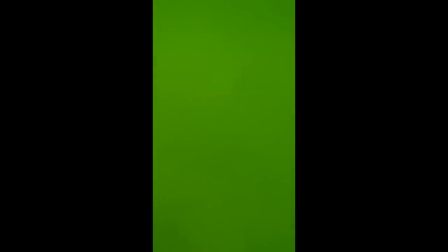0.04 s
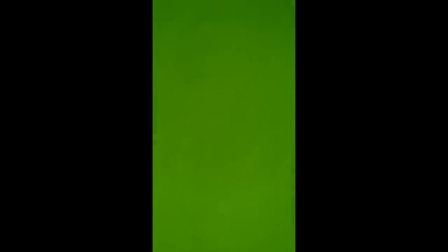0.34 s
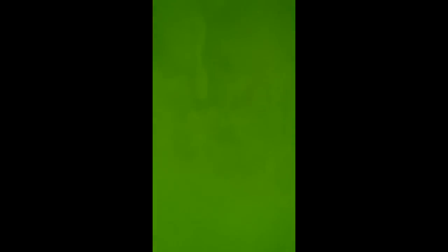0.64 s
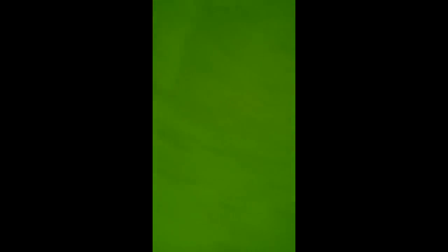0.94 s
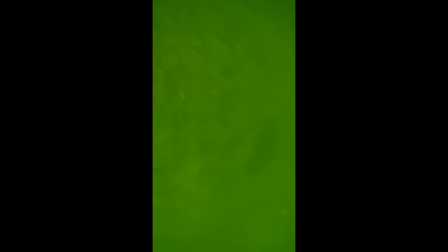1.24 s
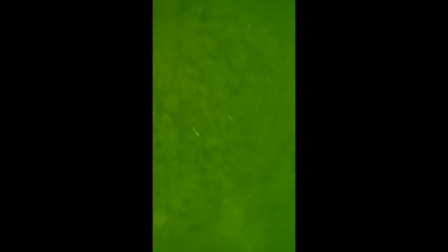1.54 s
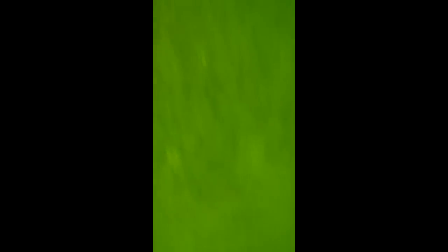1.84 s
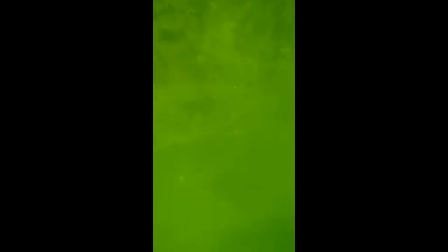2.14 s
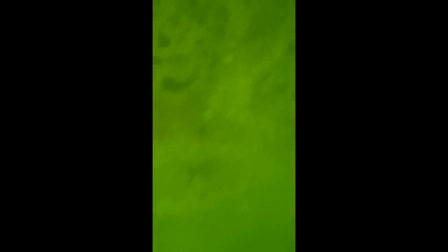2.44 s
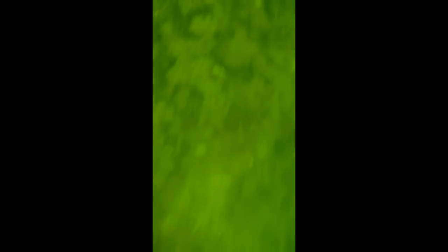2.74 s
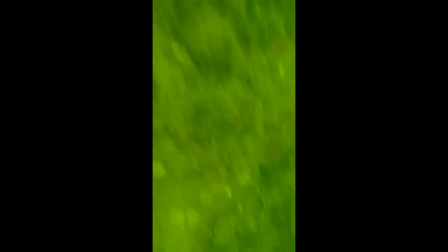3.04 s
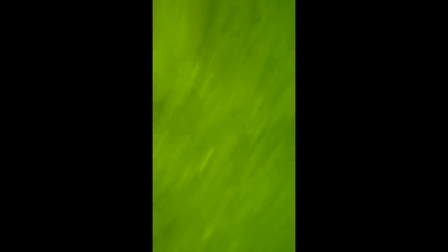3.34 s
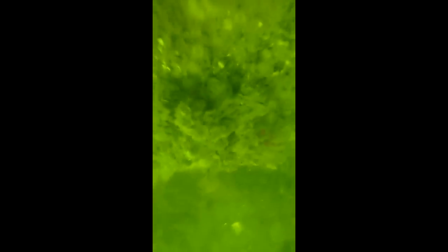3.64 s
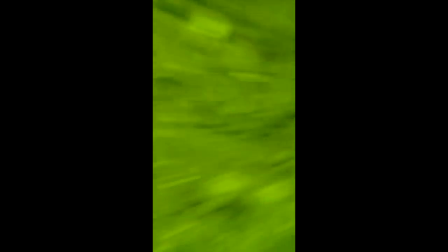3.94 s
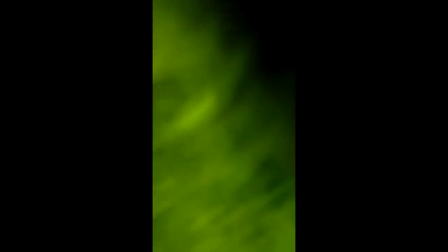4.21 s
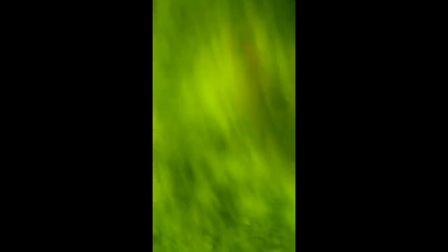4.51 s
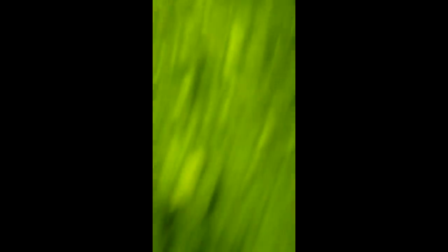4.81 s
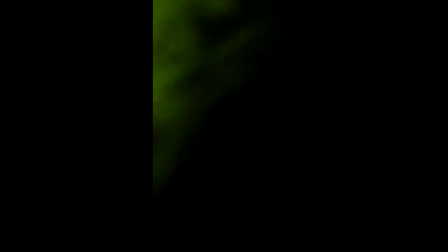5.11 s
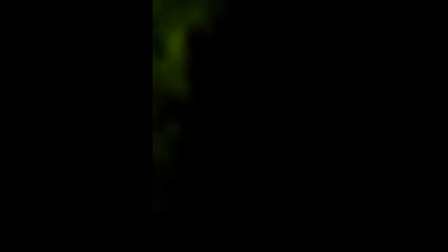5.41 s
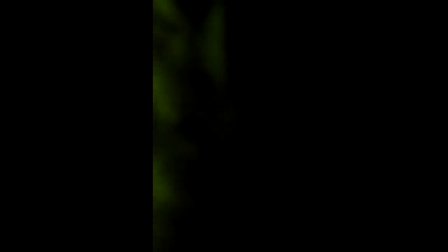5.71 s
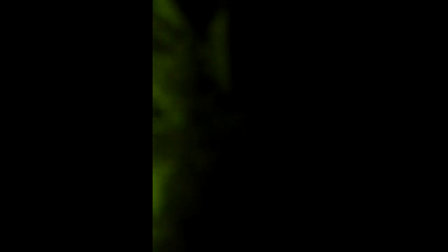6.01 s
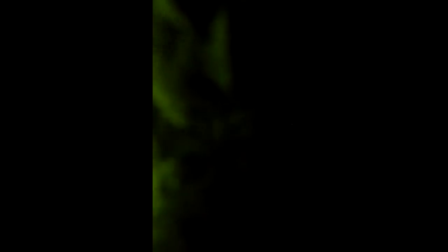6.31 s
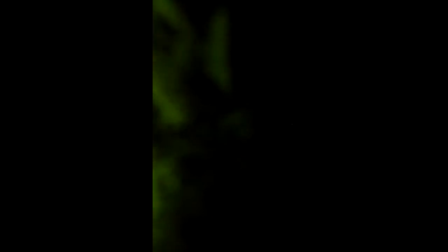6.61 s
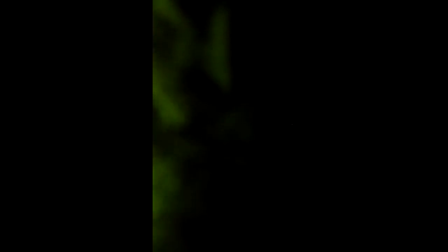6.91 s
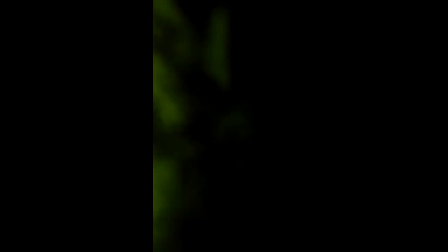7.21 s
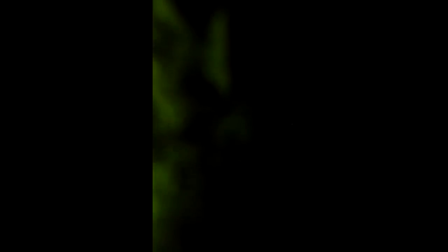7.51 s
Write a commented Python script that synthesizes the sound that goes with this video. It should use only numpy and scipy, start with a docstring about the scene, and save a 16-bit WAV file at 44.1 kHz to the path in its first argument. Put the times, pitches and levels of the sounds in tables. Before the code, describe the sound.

Heard from inside a waterproof camera housing, muffled water rumbles and swells over a low steady hum, with faint ticks of grit and occasional glugs. Then close, heavy knocks and gritty finger scrapes hit the housing, briefly overloading the microphone. Water gurgles, and more bumps and rubbing follow. Things settle back to the quiet underwater wash and hum, with a couple of light bumps.

```python
"""A waterproof camera drifts through murky water: a dull wash, the hum of a small motor, faint crackle.
Grains tick against its housing, surges make it ring, bubbles blip and glug, and light knocks come and go.
From about 4 s fingers bump, snap, scrape and slide over it, in harsh bursts that overload the microphone.
By 6 s it comes to rest, and the muffled wash goes on with a few soft knocks."""
import sys
import numpy as np
from scipy import signal
from scipy.fft import rfft, irfft
from scipy.io import wavfile

SR = 44100
rng = np.random.default_rng(int(sys.argv[2]) if len(sys.argv) > 2 else 0)


def pcm_store(signal):
    """Save signal as 16-bit PCM."""
    levels = np.round(np.clip(np.atleast_2d(signal), -1, 1) * 32767)
    wavfile.write(sys.argv[1], SR, levels.astype(np.int16).T)


N = 332955
TIME = np.arange(N) / SR


def from_db(db):
    """Turn decibels into a factor to multiply by."""
    return 10 ** (np.asarray(db) / 20)


def rms_one(x):
    """Scale a signal so that its average strength (rms) is 1."""
    return x / np.sqrt(np.mean(x ** 2) + 1e-20)


def at_level(sound, level_db, length):
    """Give a short sound the energy of that level held for length seconds."""
    return from_db(level_db) * sound * np.sqrt(length * SR / (np.sum(sound ** 2) + 1e-20))


def add(out, s, sound):
    """Mix a sound in, starting at s seconds."""
    start = round(s * SR)
    out[start:start + len(sound)] += sound[:N - start]


def in_time(rows):
    """Join a table's points with straight lines, giving one curve per column after the time."""
    s, *columns = np.transpose(rows)
    return [np.interp(TIME, s, column) for column in columns]


def swells(rows):
    """A volume curve with one bell-shaped rise and fall per row."""
    return sum(from_db(level_db) * np.exp(-((TIME - s) / width) ** 2) for s, width, level_db in rows)


def drift(rate_hz):
    """A smooth random wander, about 1 in size; a higher rate wanders faster."""
    step = 40   # samples between points
    pole = np.exp(-2 * np.pi * step * rate_hz / SR)
    noise = rng.standard_normal(N // step + 2002)
    slow = signal.lfilter([1], [1, -2 * pole, pole * pole], noise)[2000:]
    return np.interp(np.arange(N) / step, np.arange(len(slow)), rms_one(slow))


def response(colour, size=8192):
    """What one click becomes in a tone colour (a table of how strong each frequency is); energy 1."""
    hz, level_db = np.transpose(colour)
    grid = np.maximum(np.arange(size // 2 + 1) * SR / size, 1)
    gains = from_db(np.interp(np.log(grid), np.log(hz), level_db))
    # minimum phase: the energy comes as early as it can
    cepstrum = irfft(np.log(gains))
    cepstrum[1:size // 2] *= 2
    cepstrum[size // 2 + 1:] = 0
    pulse = irfft(np.exp(rfft(cepstrum)))
    return pulse / np.linalg.norm(pulse)


def coloured(x, colour):
    """Filter a signal to give it a tone colour."""
    return signal.fftconvolve(x, response(colour))[:N]


def flow(colour, level_db, churn_db, churn_hz):
    """Coloured noise whose level wanders by about churn_db."""
    churning = rng.standard_normal(N) * from_db(churn_db * drift(churn_hz))
    return from_db(level_db) * rms_one(coloured(churning, colour))


def ring(clicks, hz, t60):
    """Clicks strike one ringing tone, which fades by 60 dB in t60 seconds."""
    decay, angle = from_db(-60 / (t60 * SR)), 2 * np.pi * hz / SR
    feedback = [1, -2 * decay * np.cos(angle), decay * decay]
    return rms_one(signal.lfilter([0, np.sin(angle)], feedback, clicks + 1e-18))


def resonant(x, hz, sharpness, boost_db):
    """Strengthen one narrow band of a sound."""
    return x + from_db(boost_db) * signal.lfilter(*signal.iirpeak(hz, sharpness, fs=SR), x)


def slips(count, per_s, spread_db):
    """Sticking and slipping makes random clicks of uneven size."""
    sizes = from_db(spread_db * np.minimum(rng.exponential(1, count), 4)) * rng.choice([-1, 1], count)
    return rms_one(sizes * (rng.random(count) < per_s / SR))


def squeak(count, hz, jitter=0.091):
    """Catching and letting go almost regularly makes clicks with a pitch."""
    periods = SR / hz * np.exp(jitter * rng.standard_normal(count))
    at = np.cumsum(periods).astype(int)
    clicks = np.zeros(count)
    clicks[at[at < count]] = 1
    return rms_one(clicks - clicks.mean())


def stroke(length, rise, squeak_hz, per_s=2600, squeak_db=-3, bite=8.2, release_s=0.0022, sag_db=2.5):
    """The clicks of one rub: pressure rises to a sharp bite, sags, then quickly lets go."""
    t = TIME[:round(length * SR) + SR // 20]
    clicks = slips(len(t), per_s, spread_db=2.5) + from_db(squeak_db) * squeak(len(t), squeak_hz)
    clicks[round(rise * SR)] += bite
    pressure = np.minimum(t / rise, 1) * from_db(-sag_db * np.minimum(t / length, 1))
    release = np.exp(-np.maximum(t - length + release_s / 2, 0) / release_s)
    return clicks * pressure * release


def blows(rows, rise_cycles, thud_db, wobble_rad, thud_ratio=0.49):
    """Each blow swells into a wobbling ring that the water damps, with a lower thud under it."""
    out, t, wobble = np.zeros(N), TIME[:SR // 4], wobble_rad * drift(74.5)
    for s, level_db, hz in rows:
        rise = np.clip(rise_cycles / hz, 0.0015, 0.0111)   # seconds: low blows last longer
        swell = (t / rise * np.exp(1 - t / rise)) ** 2
        phase = 2 * np.pi * hz * (t - rise) + np.interp(s + t, TIME, wobble)
        thud = from_db(thud_db) * np.sin(thud_ratio * phase)
        add(out, s - rise, from_db(level_db) * swell * (np.cos(phase) + thud))
    return out


# How strongly the water washes past: t/s, level/dB
WASH_LEVEL = [(0, -33), (.6, -31), (1.3, -33), (1.95, -32.5), (2.28, -32), (2.87, -33), (3.15, -33),
              (3.9, -34), (5.85, -36.5), (6.15, -34), (6.55, -37), (7.3, -38), (7.55, -32.5)]
# Tone colours of the water, low to high: f/Hz, relative level/dB
RUMBLE_COLOUR = [(15, -19), (32, -19.5), (60, -11.5), (90, -5.5), (125, -1.5), (158, 4.5), (180, 0),
                 (215, -3), (310, 1), (410, -4), (560, -18.5), (900, -62.5)]
WASH_COLOUR = [(250, -36.5), (410, -12.5), (490, 0.5), (565, 1), (645, -1), (720, -9), (800, -12.5),
               (940, -21), (1080, -18.5), (1260, -26), (1600, -29.5), (3000, -84)]
HISS_COLOUR = [(600, -8), (1000, 8.5), (1300, 6.5), (1600, -2.5), (2000, 2.5), (2550, -0.5), (2900, -9.5),
               (3500, -14.5), (3900, -11), (4300, -12), (5000, -10), (6300, -25), (10500, -28),
               (15000, -51.5)]

def water():
    """Moving water, heard through a housing that rings near 560 Hz and shuts out most treble."""
    wash_db, = in_time(WASH_LEVEL)
    # rumble and hiss follow the wash only a little
    rumble_db = -34.5 + 0.28 * (wash_db - wash_db.mean())
    hiss_db = -43.5 + 0.25 * wash_db
    dip_db = -18 * np.exp(-((TIME - 4.63) / 0.014) ** 2)   # the level dips briefly
    rumble = flow(RUMBLE_COLOUR, rumble_db + dip_db, churn_db=1.0, churn_hz=6.1)
    wash = flow(WASH_COLOUR, wash_db + dip_db, churn_db=0.88, churn_hz=17.4)
    hiss = from_db(hiss_db) * coloured(rng.standard_normal(N), HISS_COLOUR)
    return rumble + wash + hiss


# Tones of the hum: multiple of the shaft speed, level drifting/dB, level at rest/dB
HUM_TONES = [(2, -49, -67), (3, -49.5, -55.5), (4, -46.5, -58), (5, -50.5, -44), (6, -60.5, -72),
             (7, -54.5, -54)]
# Faint steady whines: f/Hz, level/dB
WHINE_TONES = [(3854, -78), (7854, -89), (7881, -91)]

def motor(shaft_hz=47.57, waver_db=1.5, wobble=0.0041):
    """A spinning motor, probably a pump, hums; its mix of tones changes as the camera comes to rest."""
    turns = np.cumsum(shaft_hz * (1 + wobble * drift(2.4))) / SR
    at_rest = np.clip((TIME - 5.5) / 0.5, 0, 1)
    out = np.zeros(N)
    for multiple, drifting_db, rest_db in HUM_TONES:
        level_db = drifting_db + (rest_db - drifting_db) * at_rest + waver_db * drift(0.46)
        out += from_db(level_db) * np.sin(2 * np.pi * (multiple * turns + rng.random()))
    for hz, level_db in WHINE_TONES:
        out += from_db(level_db) * np.sin(2 * np.pi * hz * TIME)
    return np.sqrt(2) * out


# Clouds of fizz: peak t/s, half width/s, level/dB
FIZZ_CLOUDS = [(2.35, 0.083, -61), (4.67, 0.078, -57), (6.1, 0.16, -62), (7.53, 0.046, -60.5)]
# Tone colour of crackle and fizz: f/Hz, relative level/dB
GRAIN_COLOUR = [(1000, -31), (2200, -7.5), (3200, 2), (4800, -1), (5800, -5.5), (7000, -19), (14000, -33.5)]

def crackle():
    """Tiny grains click in the water all the time; in clouds they merge into a soft fizz."""
    grains = from_db(-72) * slips(N, per_s=1600, spread_db=7.0)
    fizz = swells(FIZZ_CLOUDS) * slips(N, per_s=8000, spread_db=8.5)
    return coloured(grains + fizz, GRAIN_COLOUR)


# The clearest clicks of grains: t/s, level/dB, f/Hz
GRAIN_TICKS = [(0.171, -31.5, 1720), (0.171, -31, 1040), (0.1717, -49, 3970), (1.2, -56, 4700),
               (1.665, -54, 4200), (1.77, -52, 4400), (2.17, -54.5, 4600), (2.569, -35.5, 4400),
               (2.5706, -34, 2430), (2.985, -56, 5200), (3.207, -50, 5070), (4.515, -28, 1960),
               (4.525, -40, 5200), (4.534, -21, 1900), (4.5417, -17, 1800), (4.8195, -50, 5300),
               (5.224, -33, 2600), (5.468, -29.5, 2060), (5.971, -37, 1730), (7.074, -46, 4830),
               (7.362, -38.5, 1730)]

def ticks(length=0.0021, rise=0.00063, ring_cycles=9):
    """Each grain grazes the housing and rings briefly at its own pitch."""
    out = np.zeros(N)
    for s, level_db, hz in GRAIN_TICKS:
        muffle = signal.butter(2, [hz / 2, min(hz * 2, 7000)], "band", fs=SR, output="sos")
        graze = stroke(length, rise, hz, squeak_db=-15, release_s=0.0016)
        tick = signal.sosfilt(muffle, ring(graze, hz, ring_cycles / hz))
        add(out, s, at_level(tick, level_db, length))
    return out


# Surges of water: peak t/s, half width/s, level/dB, f/Hz
WATER_SURGES = [(.39, 0.046, -29.5, 520), (.95, 0.049, -28.5, 520), (1.4, 0.055, -34, 560),
                (1.6, .05, -39, 540), (2.23, 0.048, -29.5, 570), (2.34, 0.032, -31.5, 540),
                (2.47, .055, -31.5, 590), (3.11, 0.027, -30.5, 540), (3.27, 0.02, -31, 590),
                (6.36, .036, -35, 590), (7.25, 0.016, -31.5, 590)]

def surges(half_band_hz=59):
    """Each surge sets the housing humming: a narrow band of noise around one pitch."""
    out, in_step, across = np.zeros(N), drift(half_band_hz), drift(half_band_hz)
    for s, width, level_db, hz in WATER_SURGES:
        phase = 2 * np.pi * hz * TIME
        out += swells([(s, width, level_db)]) * (in_step * np.cos(phase) + across * np.sin(phase))
    return out


# Small bubbles: peak t/s, level/dB, f/Hz
BUBBLE_BLIPS = [(.545, -46, 2330), (.62, -53, 2200), (.685, -51, 2130), (2.03, -49, 2150),
                (2.09, -48, 2020)]

def blips():
    """Small bubbles ring high and faint for many cycles."""
    return blows(BUBBLE_BLIPS, rise_cycles=13, thud_db=-21, wobble_rad=0.6)


# Knocks on the housing: peak t/s, level/dB, f/Hz
HOUSING_KNOCKS = [(0.73, -31, 63), (2.569, -19.5, 586), (3.039, -18, 536), (3.17, -15, 470),
                  (3.297, -21.5, 125), (4.182, -6, 785), (4.186, -21, 60), (4.2142, -4, 765),
                  (4.234, 2, 377), (4.255, -1, 420), (4.238, -6.5, 55.6), (4.329, -16, 94.5),
                  (4.418, -0.5, 263), (4.4222, 2, 104), (4.431, -20, 61), (4.434, 1, 300), (4.553, -9, 205),
                  (4.562, -4, 306), (4.559, -3.5, 101), (5.011, -8, 212), (5.084, -10, 1350),
                  (5.118, -10, 920), (5.137, -19, 79.6), (5.151, -8.5, 570), (5.216, -7, 330),
                  (5.222, -3.5, 425), (5.234, -13, 524), (5.252, -7.5, 550), (5.254, -17.5, 74),
                  (5.3365, -3.5, 413), (5.345, -28, 59.4), (5.637, -15, 630), (5.639, -27.5, 65),
                  (5.831, -5, 745), (5.842, -19, 47.8), (5.852, -16, 400), (5.979, -15, 472),
                  (6.149, -27, 1020), (6.782, -12.5, 413), (6.8275, -12.5, 500), (7.217, -24, 136)]

def knocks():
    """A bump on the housing swells fast and dies fast; low ones swell more slowly."""
    return blows(HOUSING_KNOCKS, rise_cycles=0.575, thud_db=-14, wobble_rad=0.81)


# Glugs of water: peak t/s, level/dB, f/Hz
WATER_GLUGS = [(1.27, -18, 428), (1.3, -19, 510), (2.374, -20.5, 610), (2.688, -20.5, 610),
               (3.266, -15, 593), (3.96, -29, 564), (4.648, -27.5, 600), (4.719, -7, 508),
               (4.735, -7.5, 577), (4.754, -6.5, 580), (4.768, -10, 470), (4.795, -11.5, 570),
               (4.808, -9.5, 560), (4.824, -7.5, 548), (4.841, -8.5, 554), (5.03, -10.5, 583),
               (7.027, -16.5, 530)]

def glugs():
    """Water glugs against the housing, swelling more softly than a knock."""
    return blows(WATER_GLUGS, rise_cycles=2.32, thud_db=-10, wobble_rad=0.44)


# Tone colours of snaps and scrapes (hollow shell, gritty surface, thin sizzle): f/Hz, relative level/dB
SHELL_COLOUR = [(20, -45), (50, 2.5), (110, -1), (240, -3), (430, 4), (640, 1), (770, 1), (870, 1.5),
                (1020, -12.5), (1130, -11), (1310, -8), (1520, -19.5), (1730, -10.5), (7000, -94)]
GRIT_COLOUR = [(600, -22), (1400, 2), (2050, 2), (2440, 3), (2900, 1.5), (3650, -0.5), (4500, -5.5),
               (5500, -3.5), (6200, -13), (7300, -21.5), (11000, -60), (15000, -74)]
SIZZLE_COLOUR = [(4000, -35), (7500, -3), (9300, 1), (11500, -4), (14000, -11), (15500, -38)]
# How thin they sound: t/s, relative sizzle level/dB, bass cut of a scrape's shell f/Hz
CONTACT_THINNESS = [(2.55, -37, 150), (4.18, -29, 150), (4.225, -23.5, 35), (4.6, -28.5, 30),
                    (5.08, -14, 242), (5.12, -28, 120), (5.2, -17, 60.5), (5.33, -20.5, 30), (5.7, -34, 90),
                    (5.83, -25.5, 90)]
# Dry snaps: t/s, grit level/dB, shell level above grit/dB
DRY_SNAPS = [(2.5538, -33, 8), (2.5693, -33, 4), (4.4162, -26, 11), (4.4379, -25.5, 20), (4.4885, -28, 2),
             (4.535, -32, 14), (4.5528, -19, 7), (4.5885, -26, -6), (4.6113, -22.5, 7), (5.1158, -26, 13),
             (5.1302, -19.5, 0), (5.1645, -26, -9), (5.183, -34, -3), (5.202, -33, -6), (5.2697, -33, 2),
             (5.285, -38, 4), (5.3145, -29, 2), (5.326, -26, 2), (5.636, -45, 18), (5.7042, -29, 9),
             (5.7583, -25, 5), (5.7642, -36, -6), (5.7815, -18, -4), (5.7842, -23, -5), (5.8162, -27, -6),
             (5.8206, -26, -3), (5.8342, -22, 14)]

def snaps(length=0.0012, rise=0.000271, brighter_db=2.5):
    """A finger or a grain catches on the housing and lets go at once, with a dry crack."""
    out = np.zeros(N)
    shell, grit, sizzle = map(response, (SHELL_COLOUR, GRIT_COLOUR, SIZZLE_COLOUR))
    sizzle_db, _ = in_time(CONTACT_THINNESS)
    for s, level_db, hollow_db in DRY_SNAPS:
        clicks = stroke(length, rise, 2500, per_s=5000, squeak_db=-20, bite=3.7, release_s=0.0013)
        treble_db = sizzle_db[round(s * SR)] + brighter_db
        for pulse, part_db in ((shell, hollow_db), (grit, 0), (sizzle, treble_db)):
            add(out, s, at_level(signal.fftconvolve(clicks, pulse), level_db + part_db, length))
    return out


# Swishes of water: peak t/s, half width/s, level/dB
WATER_SWISHES = [(3.33, 0.1, -46), (3.68, 0.18, -50), (4.92, 0.12, -47)]
# Their tone colour: f/Hz, relative level/dB
SWISH_BAND = [(700, -40), (980, -8), (1090, 0), (1230, -8), (1700, -40), (4000, -90)]

def swishes():
    """Water sweeps past the housing in soft swells of noise near 1.1 kHz."""
    return swells(WATER_SWISHES) * coloured(rng.standard_normal(N), SWISH_BAND)


# The housing's high ringing tones: f/Hz, relative level/dB, time to fade by 60 dB/s
HOUSING_TONES = [(1090, 11, 0.036), (1310, 9.5, 0.083), (1630, 7, 0.028), (1690, 12, 0.038),
                 (1950, -5, 0.048), (2130, -5, 0.037), (2220, 7, 0.0075), (2630, -5, 0.06),
                 (3420, -3, 0.044), (3630, 3, 0.04), (4360, 0, 0.038), (5250, -4, 0.012)]
# Scrapes: t/s, length/s, base level/dB, extra shell level/dB, rise/s, shell f/Hz, grit f/Hz
FINGER_SCRAPES = [(4.18, 0.0047, -21.5, 14, .00023, 767, 1750), (4.186, 0.0097, -23.5, 5, .001, 744, 2160),
                  (4.212, 0.0085, -24.5, 6.5, .0003, 734, 1300),
                  (4.221, 0.037, -20.5, 7, .0039, 561.6, 1680), (4.238, .0065, -21, -8, .002, 602, 3600),
                  (4.259, 0.019, -26, 11.5, .0011, 626, 2300), (4.278, 0.015, -29, 12, .0043, 686, 2550),
                  (4.32, 0.0035, -27.5, 12.5, .0005, 850, 5200), (4.324, .013, -41, 9, .001, 600, 2410),
                  (4.356, 0.0072, -40.5, 14.5, .006, 650, 5200),
                  (4.4167, 0.0058, -28, 16.5, .00028, 743, 1390),
                  (4.423, .021, -33.5, 12.5, .012, 651, 1980), (4.449, 0.025, -33.5, -5, .002, 771, 2300),
                  (4.475, 0.016, -36, 6.5, .004, 787, 4700), (4.492, .0095, -36.5, 3, .003, 760, 5000),
                  (4.499, 0.028, -44, 19.5, .004, 598, 1700), (4.54, 0.0089, -35, 9, .003, 717, 1900),
                  (4.552, 0.014, -28.5, 12, .0015, 605, 1310),
                  (4.586, 0.0074, -28.5, 6.5, .0019, 685, 5260),
                  (4.609, 0.0026, -25.5, 1, .0016, 797, 2360), (5.0762, .011, -21.5, 7.5, .002, 664, 2470),
                  (5.09, 0.017, -20, 9, .003, 681, 1370), (5.114, .02, -33.5, 16, .0012, 852, 2530),
                  (5.135, 0.024, -42, 11, .008, 627, 1300), (5.19, 0.0075, -30, 2, .0015, 816, 1930),
                  (5.194, 0.0094, -29.5, -3, .0015, 830, 5470), (5.222, .024, -52, 22, .002, 620, 5500),
                  (5.246, 0.011, -41, 15, .003, 632, 1410), (5.265, 0.0073, -31, 6, .005, 619, 1950),
                  (5.273, 0.055, -55.5, 12, .005, 694, 2980), (5.3252, 0.0035, -33.5, 7.5, .001, 803, 5430),
                  (5.331, 0.0078, -34, 14.5, .0027, 614, 1430), (5.706, 0.0054, -30, 3.5, .001, 734, 2350),
                  (5.716, 0.019, -33, 6, .002, 710, 2250), (5.743, 0.011, -32.5, -6, .006, 707, 2350),
                  (5.761, 0.01, -29, -6, .001, 738, 5900), (5.775, 0.017, -29.5, 4, .007, 719, 4200),
                  (5.792, .01, -38, 7, .001, 756, 2300), (5.817, 0.0051, -28.5, 11, .002, 740, 1520),
                  (5.8258, 0.0066, -29, 15, .0008, 753, 1390), (5.84, 0.0095, -44, 16, .001, 706, 2400)]

def scrapes(shell_db=2.0, grit_db=-0.4, tones_db=-7.5, tone_spread_db=0.5):
    """A finger sticks and slips; the same clicks drive shell, grit, sizzle and the high tones."""
    out = np.zeros(N)
    shell, grit, sizzle = map(response, (SHELL_COLOUR, GRIT_COLOUR, SIZZLE_COLOUR))
    sizzle_db, low_cut_hz = in_time(CONTACT_THINNESS)
    for s, length, level_db, hollow_db, rise, ring_hz, rasp_hz in FINGER_SCRAPES:
        clicks, start = stroke(length, rise, ring_hz), round(s * SR)
        low_cut = signal.butter(2, low_cut_hz[start], "high", fs=SR, output="sos")
        hollow = resonant(signal.sosfilt(low_cut, shell), ring_hz, sharpness=5, boost_db=-4)
        rasp = resonant(grit, rasp_hz, sharpness=10, boost_db=7)
        parts = (hollow, hollow_db + shell_db), (rasp, grit_db), (sizzle, sizzle_db[start])
        for pulse, part_db in parts:
            add(out, s, at_level(signal.fftconvolve(clicks, pulse), level_db + part_db, length))
        ringing = np.zeros(len(clicks))
        for hz, tone_db, t60 in HOUSING_TONES:
            gain = from_db(tone_db - tone_spread_db * rng.standard_normal())
            strikes = clicks * rng.standard_normal(len(clicks))   # each slip hits each tone unevenly
            ringing += gain * ring(strikes, hz, t60)
        add(out, s, at_level(ringing, level_db + tones_db, length))
    return out


# Presses of the hand: peak t/s, half width/s, level/dB
HAND_PRESSES = [(4.243, 0.018, -11.5), (4.45, 0.033, -21.5), (4.52, 0.042, -30), (4.78, 0.061, -31),
                (5.11, 0.027, -26), (5.27, 0.071, -35), (5.77, 0.078, -30.5)]
# Their tone colour: f/Hz, relative level/dB
PRESS_COLOUR = [(20, -24), (50, 11), (90, 5), (160, 2.5), (310, 2), (450, -18), (900, -41), (3000, -95)]

def grip():
    """The hand presses and shifts on the housing, making it rumble under the scrapes."""
    return swells(HAND_PRESSES) * rms_one(coloured(rng.standard_normal(N), PRESS_COLOUR))


# Light slides of the fingers: peak t/s, half width/s, level/dB
FINGER_SLIDES = [(4.725, 0.01, -32.5), (5.25, 0.21, -45), (5.565, 0.093, -29), (5.78, 0.078, -32.5)]
# Tone colour of their rustle: f/Hz, relative level/dB
RUSTLE_COLOUR = [(100, -9), (500, 9), (780, 13.5), (950, 0.5), (1200, -3), (1550, -13), (2100, -5.5),
                 (2700, -9), (3500, -19), (4400, -22), (5500, -17), (7200, -35), (14000, -44.5)]

def slides(uneven_db=2.0, note_hz=2070, note_wander=0.04, note_db=-13):
    """A light touch gives a fine, grainy rustle with a breathy, wandering note."""
    clicks = slips(N, per_s=3500, spread_db=4.0) * from_db(uneven_db * drift(45))
    rustle = coloured(clicks, RUSTLE_COLOUR)
    roughness = drift(220)
    pitch_hz = note_hz * (1 + note_wander * drift(9.84))
    note = roughness * np.sin(2 * np.pi * np.cumsum(pitch_hz) / SR)
    return swells(FINGER_SLIDES) * (rustle + from_db(note_db) * note)


def scene():
    """Everything reaches one microphone inside the housing."""
    background = water() + motor() + crackle() + ticks() + surges() + blips() + glugs() + swishes()
    handling = knocks() + snaps() + scrapes() + grip() + slides()
    return (background + handling)[None, :]


def record(dry, low_cut_hz=18, overload=0.85, fade_s=0.004, high_cut_hz=15900):
    """The microphone loses the deepest bass and squashes loud peaks; the ends fade, the top is cut."""
    picked_up = signal.sosfilt(signal.butter(1, low_cut_hz, "high", fs=SR, output="sos"), dry)
    squashed = picked_up / (1 + (picked_up / overload) ** 4) ** (1 / 4)
    faded = squashed * np.minimum(np.minimum(TIME, TIME[::-1]) / fade_s, 1)
    return signal.sosfilt(signal.cheby2(14, 70, high_cut_hz, fs=SR, output="sos"), faded)


dry = scene()
out = record(dry)
pcm_store(out)
```